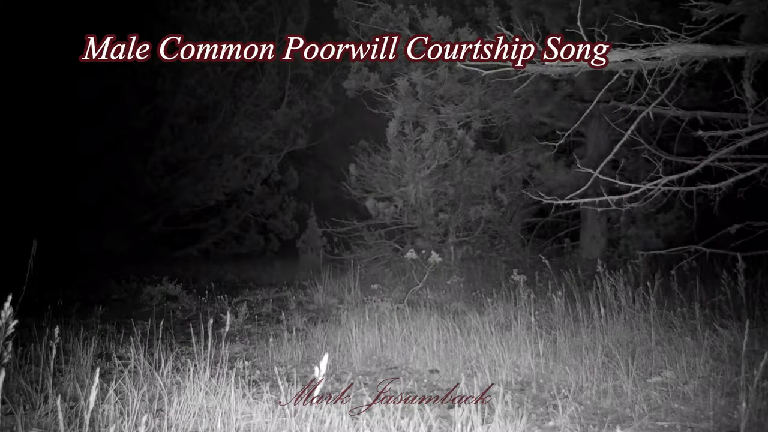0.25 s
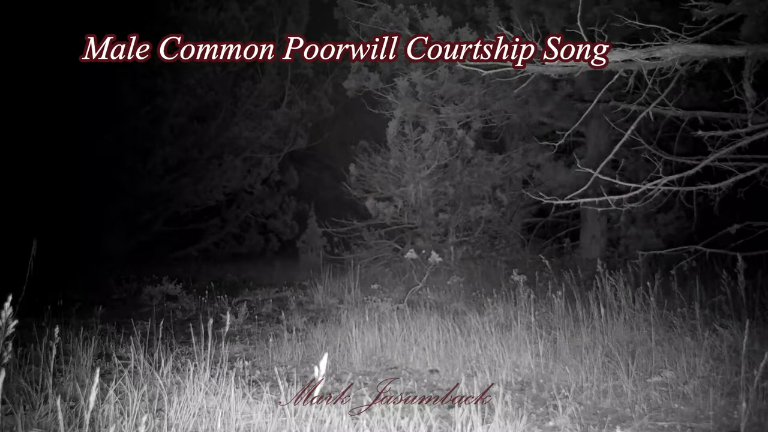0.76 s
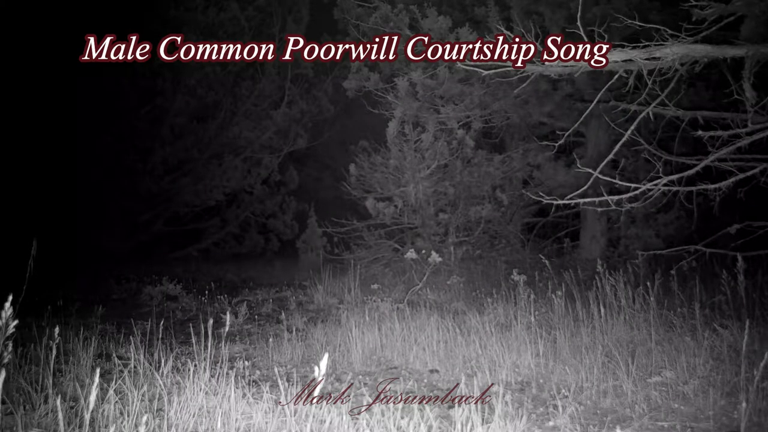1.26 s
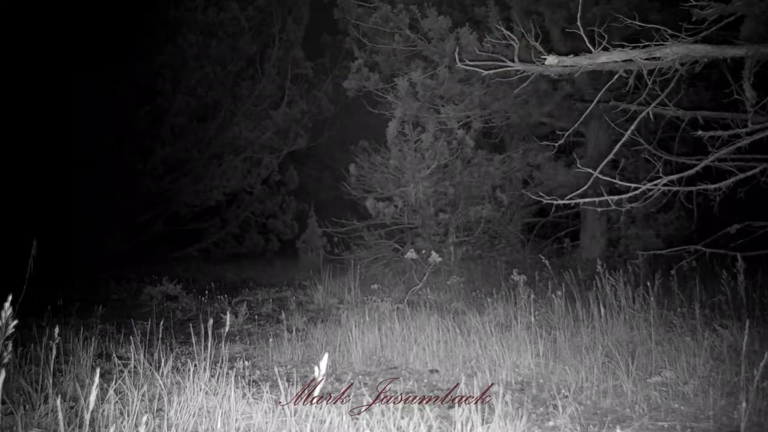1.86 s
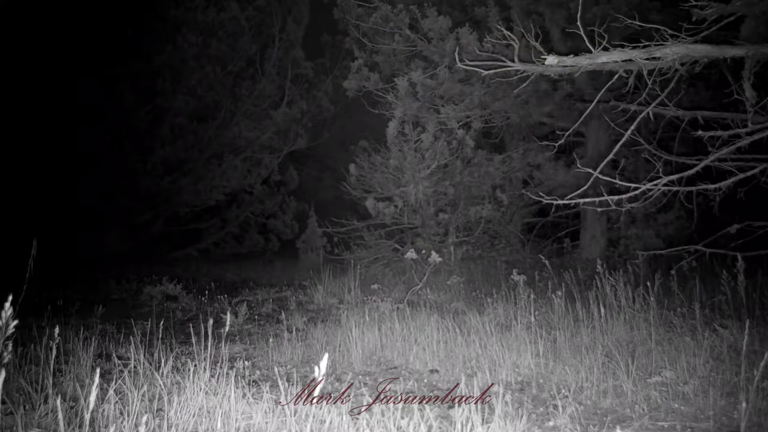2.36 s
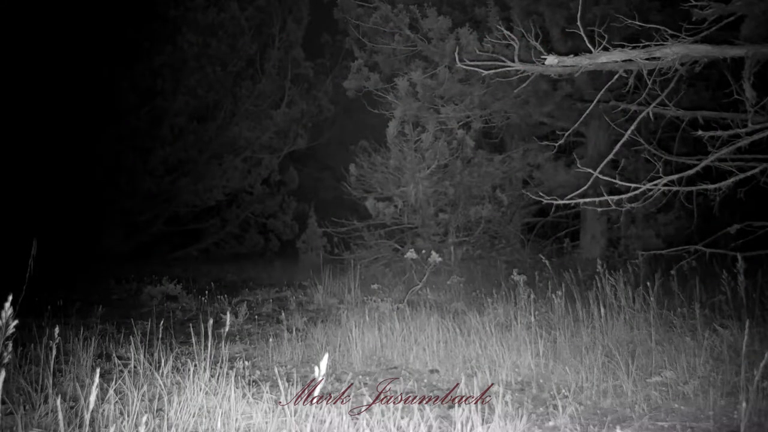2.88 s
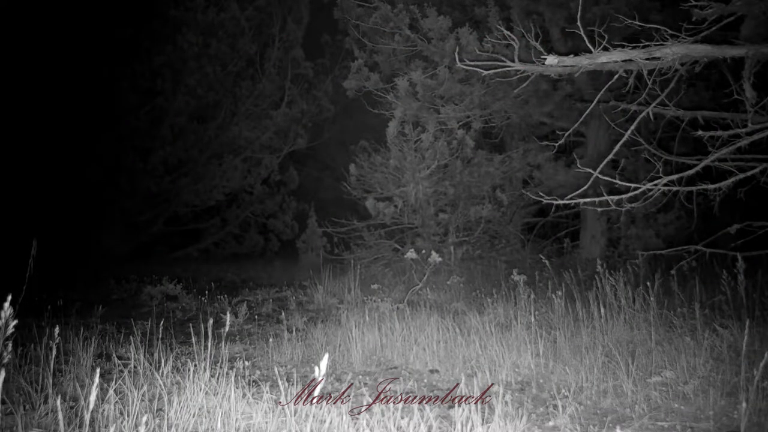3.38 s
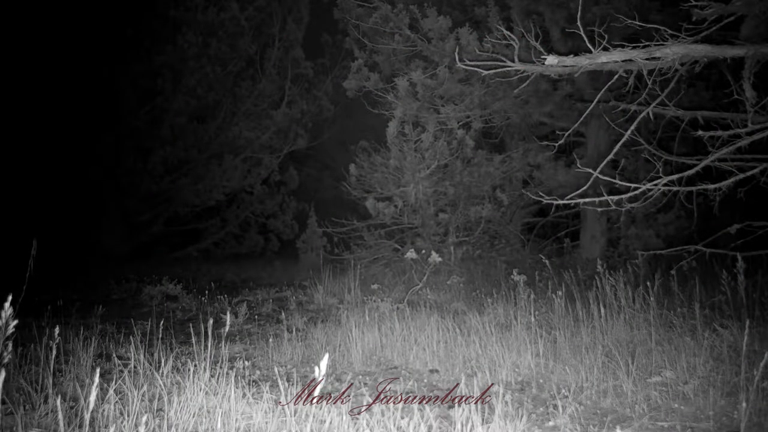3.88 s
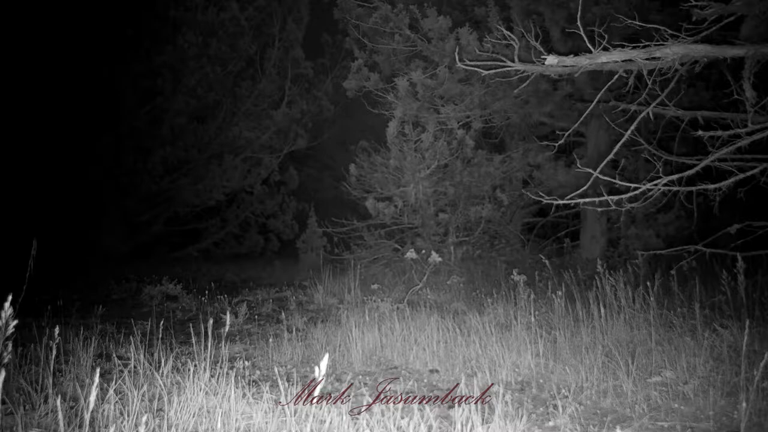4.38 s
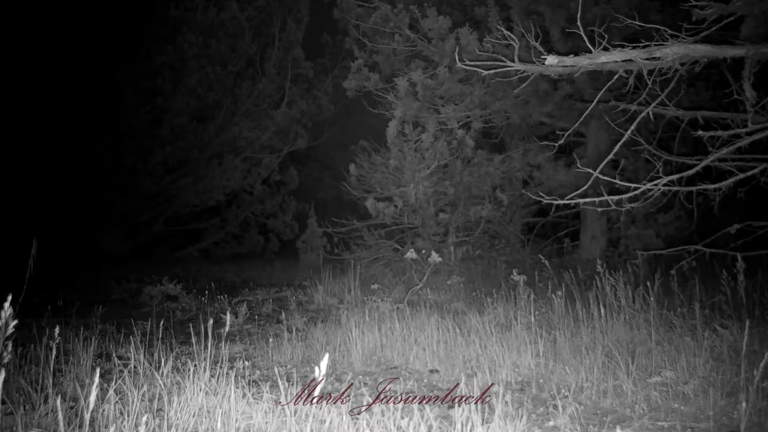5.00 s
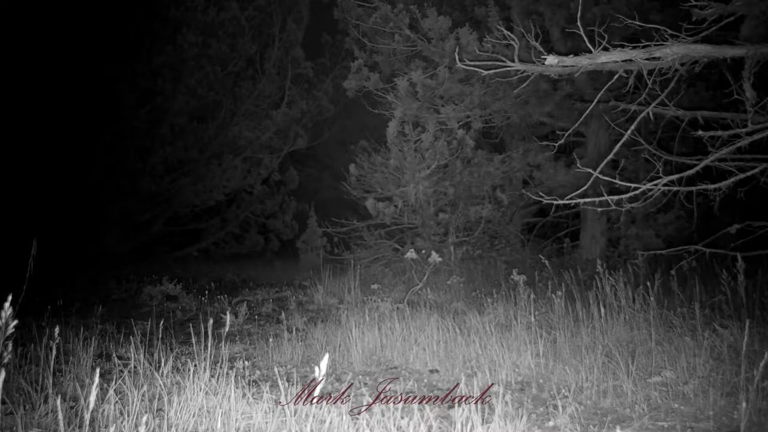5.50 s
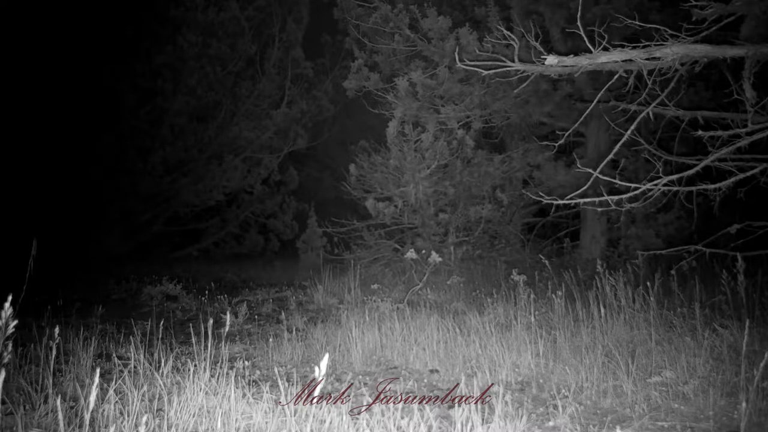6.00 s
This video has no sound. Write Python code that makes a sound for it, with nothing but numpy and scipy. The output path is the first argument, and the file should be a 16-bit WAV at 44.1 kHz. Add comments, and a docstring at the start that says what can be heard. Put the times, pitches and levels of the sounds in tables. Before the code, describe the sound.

Over an even hiss and faint buzz, a bird repeats a pure two-part whistle about once a second, echoing lightly in the woods.

```python
"""The edge of a wood at night, where a common poorwill whistles "poor-will" six times.
Each note is a pure tone; echoes from the trees beat against it as it glides.
Two small clicks and a faint rustle sound close to the microphone of a trail camera.
The camera adds hiss and a faint buzz, and its coarse sampling mirrors the whistle into the treble."""
import sys
import numpy as np
from scipy import signal
from scipy.fft import rfft, irfft, next_fast_len
from scipy.io import wavfile
from scipy.ndimage import map_coordinates

SR = 44100
rng = np.random.default_rng(int(sys.argv[2]) if len(sys.argv) > 2 else 0)


def bounce(signal):
    """Save signal as a 16-bit WAV file at the path given by the first command-line argument."""
    frames = np.transpose(np.atleast_2d(signal))
    limited = np.clip(frames, -1, 1)
    pcm = np.round(limited * 32767).astype(np.int16)
    wavfile.write(sys.argv[1], SR, pcm)


N = 275617
T = np.arange(N) / SR
CAMERA_HZ = 8000  # the camera's sample rate
REST_HZ, VOICE_DB = 1397.7, -41
CATCH_HZ, CATCH_SHARE = 39.8, 0.031  # the pitch flicks downward as the call opens and as it shuts

# The bird at the wood's edge: its "poor" notes, then its "will" notes.
# Each row: start in seconds, pitch shift in Hz, level change in dB, length in seconds.
POOR_NOTES = [(0.2676, -2, 0.5, .191), (1.337, 7, 1, 0.19), (2.3533, -3.5, 1, 0.18), (3.4204, 0, 1, 0.19),
              (4.4681, -3.4, 1, .192), (5.588, -0.5, 0.4, 0.19)]
WILL_NOTES = [(0.5, 9, -0.1, 0.15), (1.578, 8.5, -0.6, 0.14), (2.57, 3.5, -0.5, .17),
              (3.649, -3, -1.3, 0.17), (4.683, 5.5, 0, .175), (5.804, -5, -1.5, 0.18)]


def poorwill(quaver_db=1.0):
    """Both notes of the call, with a slight quaver in level."""
    song = whistle(poor, POOR_NOTES) + whistle(will, WILL_NOTES)
    return song * amp(quaver_db * wander(rate_hz=60))


def whistle(shape, notes, edge_s=.003):
    """A pure tone follows the shape of the note, a little different each time."""
    out = np.zeros(N)
    for start, shift_hz, change_db, length in notes:
        on = (T >= start) & (T < start + length)
        t = T[on] - start
        pitch_hz, level_db = shape(t / length)
        turns = np.cumsum(pitch_hz + shift_hz) / SR
        gate = np.clip(np.minimum(t, length - t) / edge_s, 0, 1)
        out[on] += gate * amp(level_db + change_db) * np.sin(2 * np.pi * turns)
    return out


def poor(u):
    """Pitch and level at share u of the first note: it lifts a little, then sinks and fades."""
    catch_hz = CATCH_HZ * (1 - ease(u, 0, CATCH_SHARE))
    lift_hz = 13.6 * ease(u, .16, .24)
    sink_hz = 115.4 * ease(u, .397, .825)
    swell_db = 4.5 * (ease(u, 0, .11) - 1)
    fade_db = 10 * ease(u, .51, .68)
    return REST_HZ + catch_hz + lift_hz - sink_hz, VOICE_DB + swell_db - fade_db


def will(u, below_hz=80.3, above_hz=175.5):
    """Pitch and level of the second note: it leaps from below and drops back to rest under one swell."""
    leap = ease(u, .143, .35)
    drop = 1 - np.exp(-(np.maximum(u - .47, 0) / .13) ** 2)
    glide_hz = below_hz * (leap - 1) + above_hz * (leap - drop)
    catch_hz = CATCH_HZ * ease(u, 1 - CATCH_SHARE, 1)
    swell_db = 22 * (ease(u, .07, .64) - 1)
    return REST_HZ + glide_hz - catch_hz, VOICE_DB + swell_db


# Echoes reaching the microphone from the nearest trees. Each row: delay in seconds, level in dB.
TREE_ECHOES = [(.02255, -16.5), (.02639, -4), (.03736, -8), (.05708, -13.5), (.0817, -19), (.105, -17),
               (.1472, -23.5)]


def wood(x, scatter_db=-16.5, t60=0.78, build_s=0.053):
    """Near trees return distinct echoes; the deeper wood scatters a faint tail."""
    size = next_fast_len(N + 2 * SR)
    hz = np.fft.rfftfreq(size, 1 / SR)
    near = sum(amp(db) * np.exp(-2j * np.pi * hz * delay) for delay, db in TREE_ECHOES)
    t = T[:SR]
    build = 1 - np.exp(-(t / build_s) ** 2)
    tail = rng.standard_normal(SR) * np.exp(-np.log(1000) * t / t60) * build
    far = amp(scatter_db) * rfft(tail / np.linalg.norm(tail), size)
    return irfft(rfft(x, size) * (1 + near + far), size)[:N]


# The rings of two small clicks, close to the microphone.
# Each row: start in seconds, level in dB, pitch in Hz, decay in seconds.
CLICK_RINGS = [(.1492, -30, 240, 0.0015), (.1499, -27.5, 2600, 0.00014), (2.41616, -32.5, 3760, 0.00058),
               (2.41616, -36, 2400, 0.0013), (2.4188, -40, 3700, .0007)]


def clicks():
    """Each click rings for a cycle or a few."""
    out, t = np.zeros(N), T[:SR // 20]
    for start, db, hz, decay in CLICK_RINGS:
        ring = np.exp(-t / decay) * np.sin(2 * np.pi * hz * t)
        out[round(start * SR):][:len(t)] += amp(db) * ring
    return out


# Soft stirs close by. Each row: peak time in seconds, level in dB, centre in Hz, half length in seconds.
NEAR_STIRS = [(0.154, -51.5, 350, .01), (0.19, -57, 2220, 0.05), (1.263, -53, 2670, 0.018),
              (1.294, -44.5, 70, 0.024)]


def stirs():
    """Faint rustles and a low bump: an octave or two of noise under a short swell."""
    out = np.zeros(N)
    for peak_s, db, hz, half_s in NEAR_STIRS:
        noise = coloured(rng.standard_normal(N), [(hz / 4, -30), (hz, 0), (hz * 4, -30)])
        out += amp(db) * np.exp(-((T - peak_s) / half_s) ** 2) * noise
    return out


# The steady hiss at the microphone. Each row: frequency in Hz, relative level in dB.
HISS_SPECTRUM = [(5, -20.5), (14, -2.5), (35, -1), (120, -2), (250, -3), (500, -8), (1000, -12),
                 (2000, -14.5), (3000, -15.5), (3900, -17)]


def hiss(level_db=-49.0, drift_db=0.26):
    """The even noise of the microphone and the night air."""
    level = amp(level_db + drift_db * wander(rate_hz=2.9))
    return level * coloured(rng.standard_normal(N), HISS_SPECTRUM)


# The buzz from inside the camera. Each row: frequency in Hz, relative level in dB.
BUZZ_SPECTRUM = [(15, -14), (90, -0.5), (250, -5), (600, -2.5), (1100, -10.5), (2000, -24.5), (3900, -30)]


def buzz(level_db=-59.0, field_hz=59.975, weak=0.44, uneven=0.32, burst_s=0.0014):
    """The camera's electronics give the same short burst once a picture field, strong and weak in turn."""
    fields = np.arange(int(N / SR * field_hz))
    strength = np.where(fields % 2, weak, 1) + uneven * rng.standard_normal(len(fields))
    ticks = np.zeros(N)
    ticks[((fields + .5) / field_hz * SR).astype(int)] = strength
    t = T[:int(SR / field_hz)]
    burst = rfft(rng.standard_normal(len(t)) * np.exp(-t / burst_s), N)
    smeared = irfft(rfft(ticks) * burst / abs(burst), N)  # spreads each tick without colouring it
    return amp(level_db) * coloured(smeared, BUZZ_SPECTRUM)


def amp(db):
    """Decibels to gain."""
    return 10 ** (np.asarray(db) / 20)


def unit_rms(x):
    """Scales to rms 1."""
    return x / np.sqrt(np.mean(x ** 2) + 1e-20)


def coloured(x, spectrum):
    """Gives x a spectrum within the camera's band, at rms 1."""
    hz = np.fft.rfftfreq(N, 1 / SR)
    points_hz, db = np.transpose(spectrum)
    gain = amp(np.interp(np.log(hz + 1), np.log(points_hz), db)) * (hz < CAMERA_HZ / 2)
    return unit_rms(irfft(rfft(x) * gain, N))


def wander(rate_hz):
    """Smooth random motion of rms 1."""
    hz = np.fft.rfftfreq(N, 1 / SR)
    return unit_rms(irfft(rfft(rng.standard_normal(N)) * np.exp(-(hz / rate_hz) ** 2), N))


def ease(u, start, end):
    """A smooth step from 0 to 1 as u goes from start to end."""
    return .5 - .5 * np.cos(np.pi * np.clip((u - start) / (end - start), 0, 1))


def scene():
    """The bird among the trees, over small sounds nearby and the camera's own noises, in mono."""
    return (wood(poorwill()) + hiss() + buzz() + clicks() + stirs())[None]


def record(dry):
    """The camera's coarse samples, joined by straight lines, mirror the sound into the treble."""
    sample_at = np.arange(0, N, SR / CAMERA_HZ)
    samples = map_coordinates(dry[0], [sample_at], order=3, mode="nearest")
    joined = np.interp(np.arange(N), sample_at, samples)
    low_pass = signal.firwin(511, cutoff=15700, window=("kaiser", 9), fs=SR)
    return signal.oaconvolve(joined, low_pass, "same")[None]


dry = scene()
out = record(dry)
bounce(out)
```